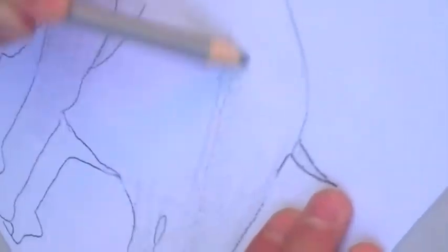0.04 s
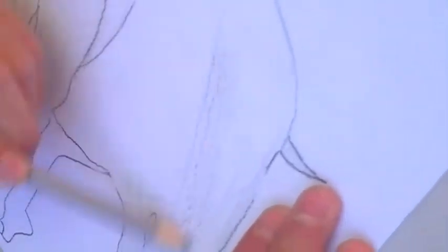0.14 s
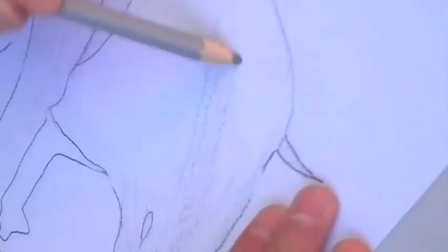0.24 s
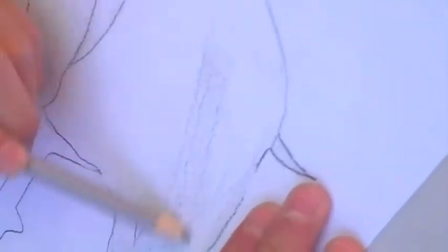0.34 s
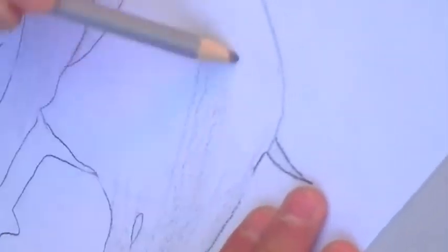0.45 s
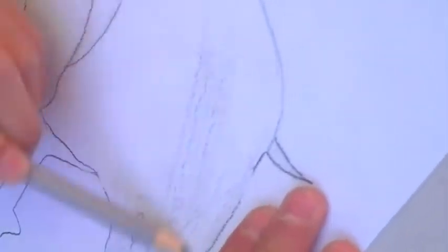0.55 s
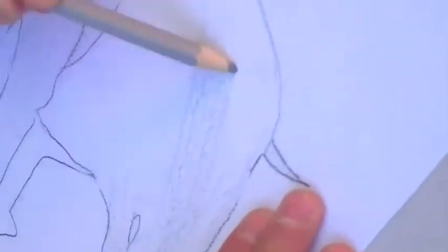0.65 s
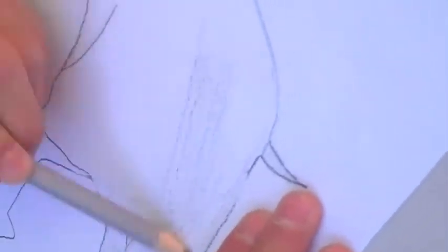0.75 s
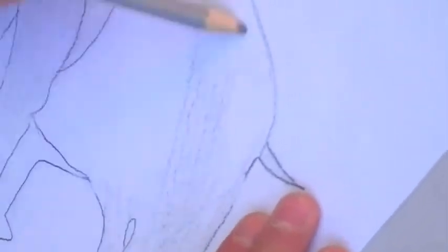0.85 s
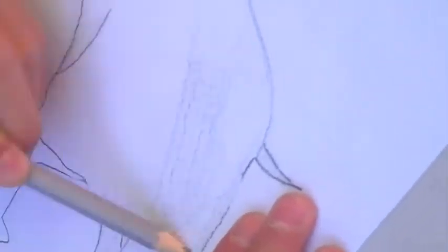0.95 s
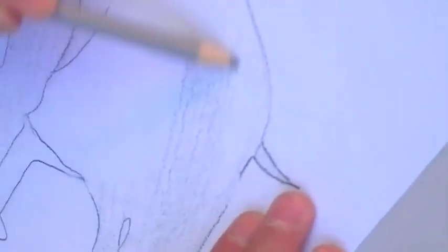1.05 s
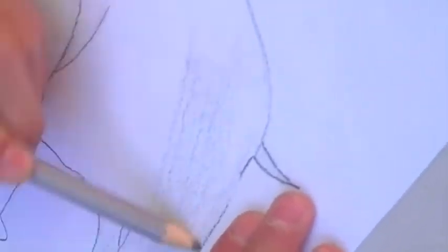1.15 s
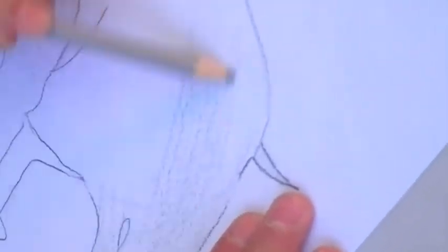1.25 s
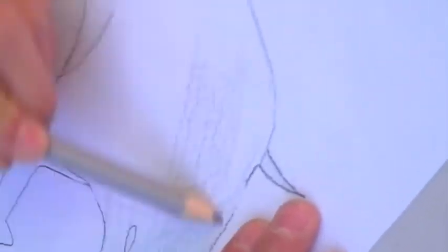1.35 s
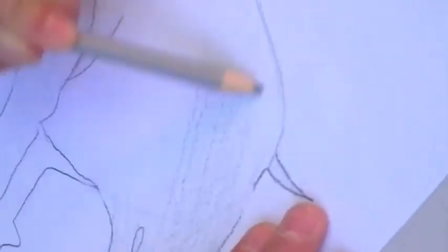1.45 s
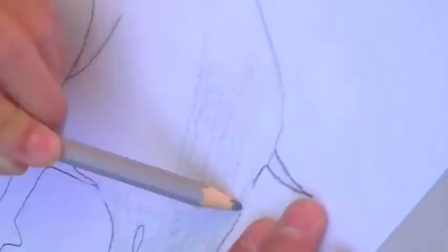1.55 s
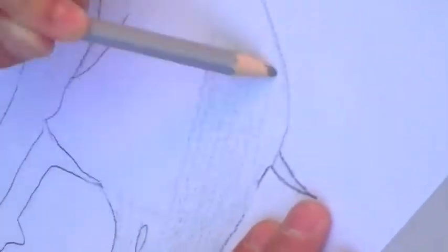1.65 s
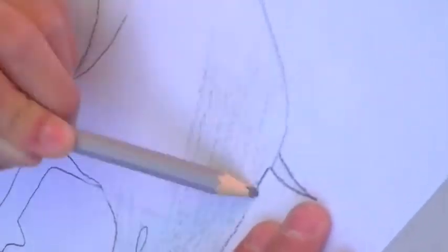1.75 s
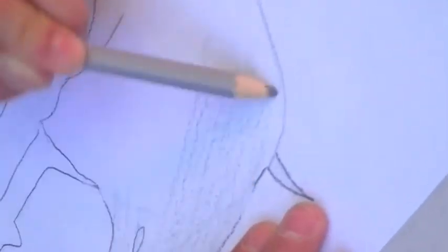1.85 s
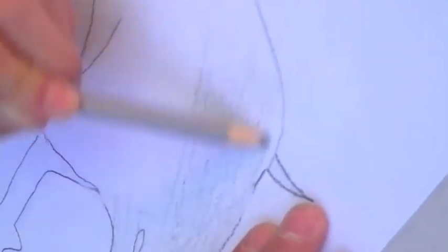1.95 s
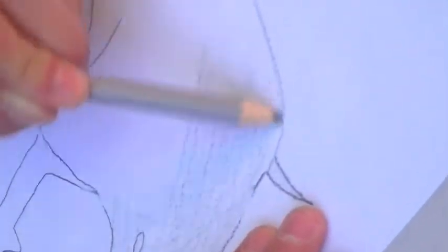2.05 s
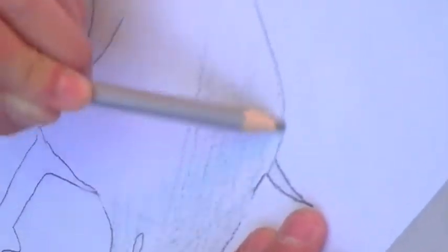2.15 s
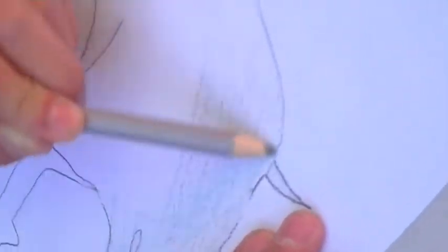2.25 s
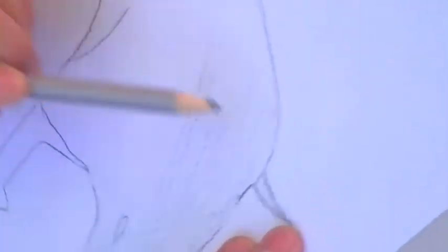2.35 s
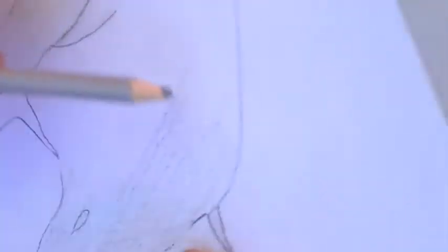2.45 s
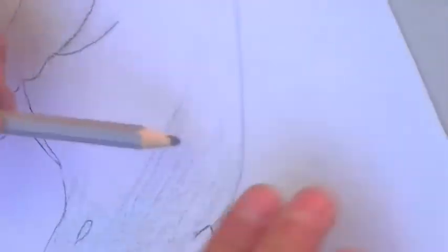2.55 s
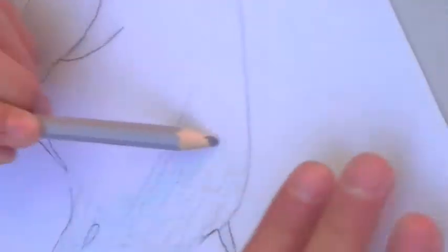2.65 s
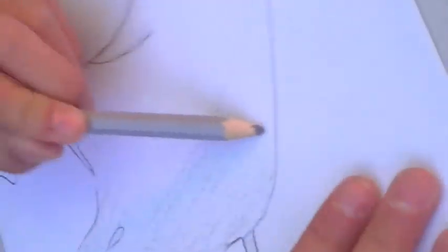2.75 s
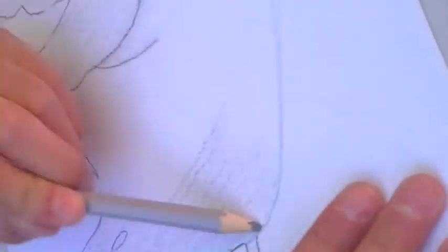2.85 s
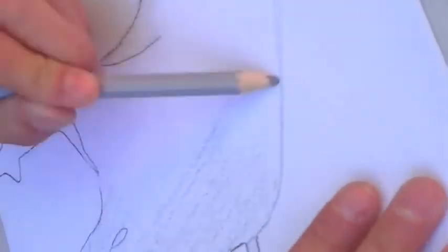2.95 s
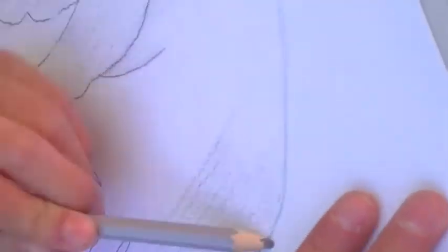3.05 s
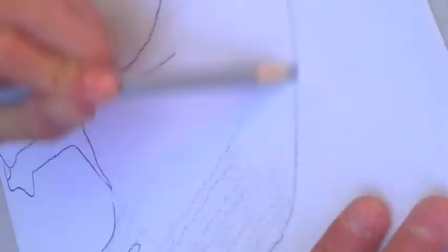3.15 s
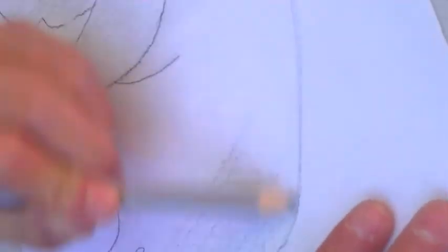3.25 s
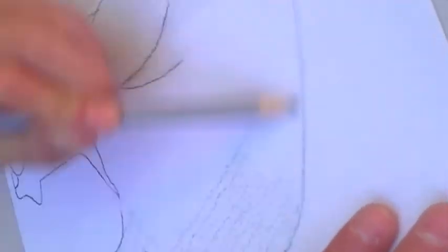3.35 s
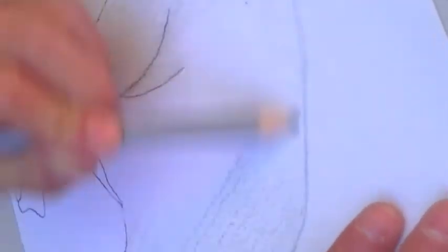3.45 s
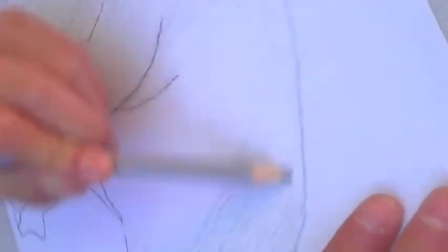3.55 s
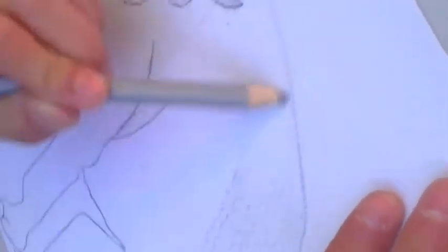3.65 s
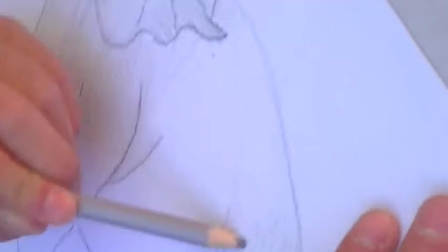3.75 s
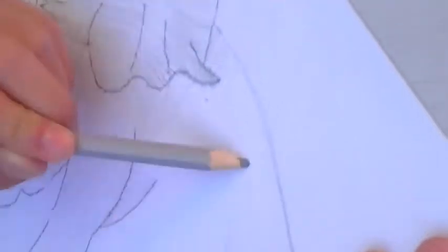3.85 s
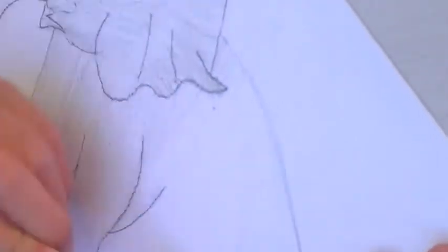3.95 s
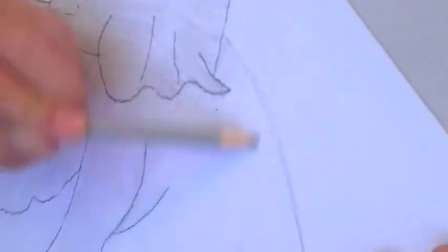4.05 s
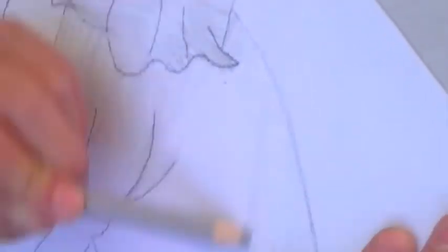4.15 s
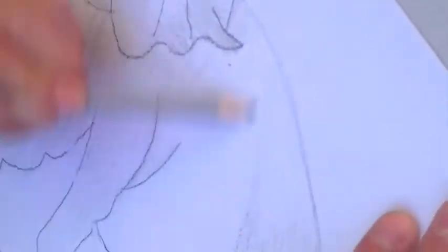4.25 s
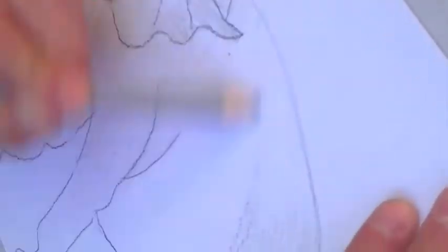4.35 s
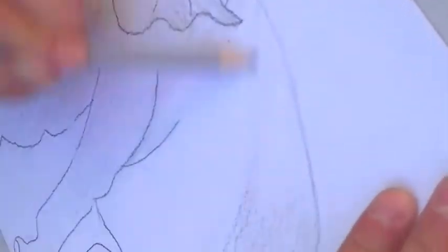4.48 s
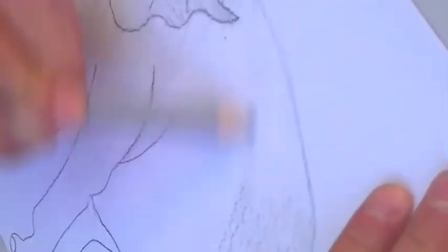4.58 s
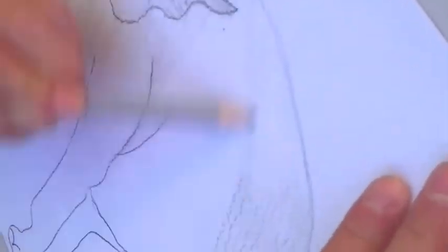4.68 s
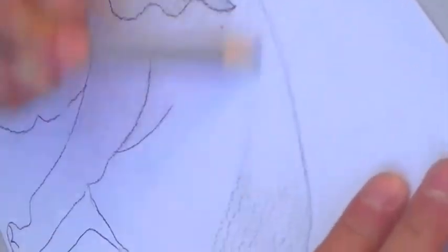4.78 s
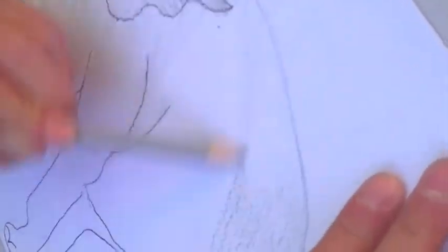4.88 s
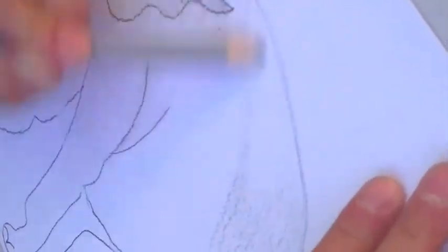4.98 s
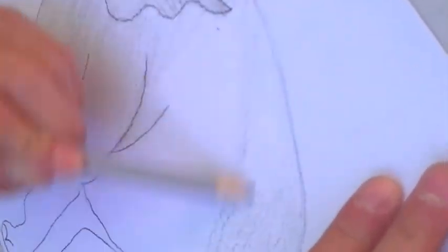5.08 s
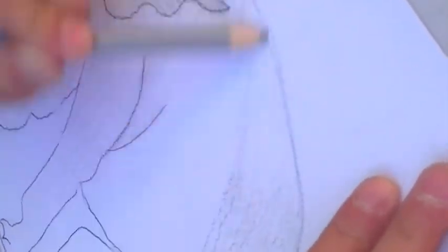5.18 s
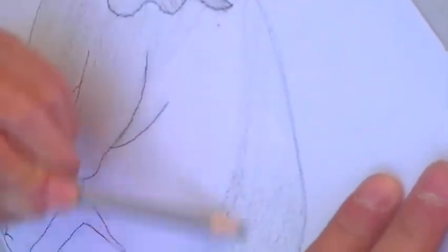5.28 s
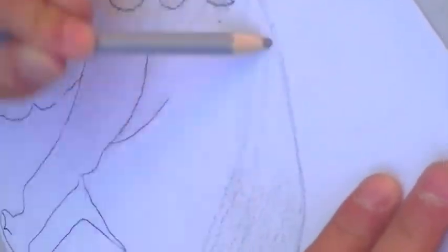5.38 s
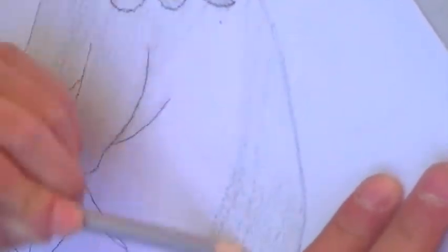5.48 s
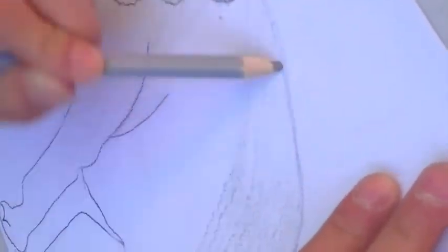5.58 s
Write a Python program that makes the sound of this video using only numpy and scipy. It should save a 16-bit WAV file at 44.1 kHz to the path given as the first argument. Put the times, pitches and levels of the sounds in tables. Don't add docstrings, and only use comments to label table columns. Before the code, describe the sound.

In a quiet room, a hand shades paper with a wooden pencil, very close to a small stereo microphone. About ten quick scratchy strokes a second rasp brightly, fade and nearly stop around two and a half seconds, then resume more softly. Light taps and a sharp knock near four seconds interrupt, then even shading continues to the end.

```python
import sys
import numpy as np
from scipy import signal
from scipy.fft import rfft, irfft, next_fast_len
from scipy.io import wavfile
from scipy.ndimage import uniform_filter1d

SR = 44100
rng = np.random.default_rng(int(sys.argv[2]) if len(sys.argv) > 2 else 0)


def wrap_up_sound(samples):
    columns = np.atleast_2d(samples).T
    tamed = np.clip(columns, -1, 1)
    steps = np.round(tamed * 32767).astype(np.int16)
    wavfile.write(sys.argv[1], SR, steps)


def convert_level_to_amplitude(level_db):
    exponent = np.asarray(level_db, float) / 20
    return 10 ** exponent


N = 247842
LEFT_RIGHT = np.array([[1], [-1]])


def unit(x):
    return x / np.sqrt(np.mean(x ** 2))


def on_log_axis(table, hz):
    points = np.array(table)
    return np.interp(np.log(np.maximum(hz, 1)), np.log(points[:, 0]), points[:, 1])


def colour(x, table):
    size = next_fast_len(N)
    hz = np.arange(size // 2 + 1) * SR / size
    return irfft(rfft(x, size) * convert_level_to_amplitude(on_log_axis(table, hz)), size)[:N]


def resonate(x, hz, width):
    b, a = signal.iirpeak(hz, hz / width, SR)
    return signal.lfilter(b, a, signal.lfilter(b, a, x))


def walk(rate):
    k = max(int(SR / rate), 1)
    held = np.repeat(rng.standard_normal(N // 100)[:N // k + 1], k)[:N]
    return unit(uniform_filter1d(uniform_filter1d(held, k), k))


# (f/Hz, level/dB per Hz)
ROOM_MID = [(20, 7.5), (60, -18), (120, -11.5), (225, -12), (350, -7), (480, -11.5), (1000, -21),
            (1300, -10.5), (2200, -11), (4800, -9.5), (6500, -25.5), (9000, -32.5), (13000, -42.5),
            (15500, -32)]
# (f/Hz, level/dB per Hz)
ROOM_SIDE = [(20, -2), (60, -12), (120, -4.5), (250, -2), (600, -8.5), (1000, -17), (1310, -17.5),
             (1800, -17), (4100, -9.5), (6500, -17.5), (9000, -18.5), (13000, -56), (15500, -52)]


def room():
    mid = unit(colour(rng.standard_normal(N), ROOM_MID)) * convert_level_to_amplitude(-52 + 0.13 * walk(5.71))
    side = unit(colour(rng.standard_normal(N), ROOM_SIDE)) * convert_level_to_amplitude(-56.5 + 3.5 * walk(6.6))
    return (mid + side * LEFT_RIGHT) * convert_level_to_amplitude(-.8 * LEFT_RIGHT)


# (t/s of the turn that starts it, tooth hiss level/dB)
FIRST_PATCH = [(-0.06, -33.5), (0.014, -38), (0.121, -38.5), (0.225, -36.5), (0.329, -41), (0.431, -37),
               (0.528, -39.5), (0.632, -38), (0.735, -39.5), (0.84, -37.5), (0.945, -40.5), (1.054, -38.5),
               (1.157, -39.5), (1.256, -41.5), (1.367, -39.5), (1.466, -40.5), (1.559, -41.5),
               (1.651, -41.5), (1.742, -41), (1.841, -43.5), (1.932, -40.5), (2.007, -43.5), (2.094, -45),
               (2.197, -49), (2.276, -48.5), (2.363, -49), (2.436, -44.5), (2.56, -67), (2.735, -51)]
# (t/s of the turn that starts it, tooth hiss level/dB)
SECOND_PATCH = [(2.832, -45), (2.943, -42.5), (3.049, -43), (3.154, -41), (3.268, -43), (3.38, -42.5),
                (3.492, -44), (3.601, -49), (3.724, -54), (3.79, -50), (3.849, -55), (3.9, -51),
                (3.968, -46.5), (4.062, -43), (4.176, -42.5), (4.281, -42.5), (4.396, -41.5),
                (4.508, -41.5), (4.616, -43), (4.729, -44), (4.837, -44), (4.943, -44), (5.046, -43.5),
                (5.155, -41), (5.255, -42), (5.363, -41), (5.465, -42), (5.577, -38.5), (5.68, -44)]
# (t/s, grip as shaft ring over hiss level/dB, palm dragging on the sheet level/dB)
HAND = [(0.0, 10.5, -46.5), (0.12, -1, -53), (0.55, 0.5, -62), (1.2, -3.5, -51), (1.85, -7, -64),
        (2.0, -20, -67), (2.28, -11, -48.5), (2.43, -24, -40.5), (2.57, -14, -51), (2.82, -9, -62),
        (2.95, 0, -55), (3.4, -2, -48), (3.5, -0.5, -42.5), (3.75, -8, -44), (3.86, 10.5, -42),
        (3.97, -0.5, -42), (4.07, 0, -49.5), (5.62, 1.5, -48)]


def motion():
    s, top_db = np.transpose(FIRST_PATCH + SECOND_PATCH)
    when, grip_db, palm_db = np.transpose(HAND)
    t = np.arange(N) / SR
    k = np.clip(np.searchsorted(s, t, side="right") - 1, 0, len(s) - 2)
    length = s[k + 1] - s[k]
    way = (-1.) ** k
    top_speed_at = 0.5 - 0.01 * way
    along = np.clip((t - s[k]) / length, 0, 1) ** (np.log(.5) / np.log(top_speed_at))
    speed = np.sin(np.pi * along) ** (0.062 / length)
    grip = np.interp(s[k] + length / 2, when, grip_db)
    shaft_db = grip + 0.1 * way
    board_db = -12.5 + 0.52 * grip - 0.56 * (top_db[k] - np.median(top_db))
    palm = convert_level_to_amplitude(np.interp(t, when, palm_db))
    return speed, top_db[k], palm, shaft_db, board_db


# (t/s, peak level/dB, shaft ring level/dB over peak)
SNAGS = [(0.0658, -10, -8.5), (0.096, -15.5, -38), (0.243, -42, -5), (0.343, -17.5, -26),
         (0.5432, -21, -19), (0.575, -25, 5), (0.667, -14, -12), (0.867, -19.5, 2), (1.086, -19.5, -1),
         (1.1897, -23.5, 1.5), (1.283, -21.5, 0.5), (1.5896, -17, -10), (1.6874, -23, -2),
         (3.077, -20, -22), (3.226, -18, -9.5), (3.782, -40.5, 5), (3.9, -35, 9), (4.0892, -39, 13.5),
         (4.3158, -31.5, -1), (4.5655, -17, -22), (4.7592, -28, 9.5), (4.986, -29, 10.5), (5.0918, -37, -3),
         (5.3814, -26, -10), (5.3981, -31.5, 7), (5.493, -14.5, -28), (5.5947, -36, 1)]


def bites():
    t = np.arange(N) / SR
    tooth, shaft = np.zeros(N), np.zeros(N)
    starts = [(s + .019, db + 16, -18, 0.0056) for s, db in FIRST_PATCH[1:] + SECOND_PATCH]
    for s, db, shaft_db, fade in starts + [(*snag, 0.013) for snag in SNAGS]:
        i = slice(int(s * SR), int((s + .12) * SR))
        grip = np.exp(-(t[i] - s) / fade)
        tooth[i] += convert_level_to_amplitude(db - 21.5) * grip
        shaft[i] += convert_level_to_amplitude(db + shaft_db - 14) * grip
    return tooth, shaft


def scrape(catch, grit_db):
    return unit(rng.standard_normal(N) * convert_level_to_amplitude(grit_db * rng.exponential(size=N)) * catch)


def sheen(band, speed, sliding, grip_db):
    moving = np.clip(np.hypot(speed / .5, sliding), .3, 1) ** 2 / (speed + .3) ** .25
    up = max(band - 10, 0)
    return moving ** (up / 2) * convert_level_to_amplitude(-0.05 * grip_db * up)


# (f/Hz, level/dB per Hz)
TOOTH = [(900, -24.5), (1500, -17.5), (2500, -10.5), (3320, -12), (4100, -8.5), (5060, -10.5),
         (6200, -10.5), (7200, -15), (8200, -25), (11500, -30), (13900, -38), (15500, -87)]
# (f/Hz, side over mid level/dB)
TOOTH_WIDE = [(900, -30), (1400, -50), (2000, -9), (2600, -4), (3500, -8.5), (5000, -6.5), (7500, -4),
              (10000, 1.5), (15500, 0.5)]


def tooth_hiss(catch, speed, sliding, grip_db):
    mid, side = (rfft(colour(scrape(catch, grit_db=1.5), TOOTH)) for _ in range(2))
    hz = np.arange(len(mid)) * SR / N
    pair = mid + convert_level_to_amplitude(on_log_axis(TOOTH_WIDE, hz)) * side * LEFT_RIGHT
    place = 3 * np.log2(np.maximum(hz, 1) / 700)
    hiss = np.zeros((2, N))
    for k in range(15):
        band = irfft(pair * np.clip(1 - abs(place - k), 0, 1), N)
        flicker = convert_level_to_amplitude(3.15 * walk(70) + 1.55 * walk(15))
        hiss += band * sheen(k, speed, sliding, grip_db) * flicker
    return unit(hiss)


# (f/Hz, width/Hz, level/dB)
LEAD = [(4034, 280, -2.5), (4970, 145, 4.5), (5650, 440, 0.5), (6540, 530, 0.5), (8800, 590, -11.5)]


def lead_flecks(speed):
    flecks = np.zeros((2, N))
    for hz, width, db in LEAD:
        flare = convert_level_to_amplitude(db + 2.9 * walk(90))
        flecks += flare * resonate(rng.standard_normal((2, N)), hz, 1.66 * width)
    return unit(flecks[0] + 0.56 * flecks[1] * LEFT_RIGHT) * speed


# (f/Hz, width/Hz, level/dB)
SHAFT = [(1944, 122, 9.5), (2035, 238, 8.5), (2464, 470, 0.5), (1575, 60, 0)]


def shaft_ring(catch):
    judder = scrape(catch * convert_level_to_amplitude(1.5 * walk(120)), grit_db=1.6)
    return unit(sum(convert_level_to_amplitude(db + 0.85 * walk(14)) * resonate(judder, hz, 0.85 * w) for hz, w, db in SHAFT))


# (f/Hz, width/Hz, level/dB)
BOARD = [(330.5, 67, -1), (651, 157, -7.5), (1398, 240, -1)]


def board_ring(catch):
    push = scrape(catch * convert_level_to_amplitude(2.1 * walk(60)), grit_db=1.6)
    return unit(sum(convert_level_to_amplitude(db) * resonate(push, hz, w) for hz, w, db in BOARD))


def pencil():
    speed, top_db, palm, shaft_db, board_db = motion()
    tooth_bite, shaft_bite = bites()
    catch = convert_level_to_amplitude(1.65 * walk(90) + 0.41 * walk(250))
    hiss = tooth_hiss(catch, speed, palm / convert_level_to_amplitude(top_db), shaft_db)
    hiss = unit(hiss + convert_level_to_amplitude(-1.5) * lead_flecks(speed))
    stroke = convert_level_to_amplitude(top_db - 1.5) * speed ** 1.22
    hiss = hiss * np.sqrt((0.44 * palm) ** 2 + stroke ** 2 + tooth_bite ** 2)
    sing = convert_level_to_amplitude(top_db + shaft_db - 0.96) * speed ** 5.6
    shaft = shaft_ring(catch) * np.hypot(sing, shaft_bite)
    board = board_ring(catch) * convert_level_to_amplitude(top_db + board_db - 0.5) * speed ** 1.8
    return hiss + shaft * (1 - 0.059 * LEFT_RIGHT) + board


# (t/s, peak level/dB, pitch share of the table modes, ring length share)
TAPS = [(0.024, -32.5, 1.28, 0.87), (0.039, -29, 1.13, 0.75), (0.221, -32.5, 1.1, 0.64),
        (0.467, -13, 1.07, 0.81), (0.475, -21.5, 1.01, 0.8), (0.493, -33, 1, 1.2), (1.412, -11, 1.13, 0.94),
        (1.425, -22, 1.04, 1.7), (1.441, -34.5, 0.97, 1.3), (1.607, -31.5, 1.08, 1.34),
        (3.201, -22, 0.96, 0.61), (3.856, -19, 1.08, 0.79), (3.885, -32.5, 1.01, 2.6), (3.91, -24, 1, 0.69),
        (3.95, -4.5, 1.05, 0.85), (5.01, -20, 1, 1.17), (5.034, -34, 1.01, 1.1)]
# (t/s, peak level/dB, pitch share of the table modes, hollow level/dB over peak, ring length share)
KNUCKLES = [
    (1.396, -38, 1.23, -5, 0.86),
    (2.881, -45, 1.1, -6.5, 0.87),
    (3.341, -39, 1.4, -15, 0.73),
    (3.43, -37.5, 1.33, -19, 1.1),
    (3.815, -33.5, 0.74, -20, 0.4),
    (3.863, -36.5, 0.76, -25, 0.97),
    (3.94, -32, 1.16, -9, 0.87),
    (5.004, -32, 1.15, 2, 1.43),
    (5.026, -26.5, 1.05, -22, 1.6),
]
# (t/s, peak level/dB, pitch share
RIM = [
    (3.811, -21, 0.96, 1.25),
    (3.897, -36, 0.92, 2.2),
    (3.963, -27, 1.18, 1.1),
    (3.968, -50, 0.74, 0.84),
    (4.151, -35, 0.81, 1.3),
    (4.157, -32.5, 0.96, 2.1),
    (4.168, -38, 0.894, 2.2),
]


def contacts():
    taps = [(s, db, -31.5 - 0.17 * db, -15.5, pitch, ring) for s, db, pitch, ring in TAPS]
    padded = [(s, db, -25, -30, pitch, ring) for s, db, pitch, ring in RIM]
    knuckles = [(s, db, -12.5, hollow_db, pitch, ring) for s, db, pitch, hollow_db, ring in KNUCKLES]
    return taps + padded + knuckles


# (f/Hz, level/dB, t60/s)
TABLE = [(1318, -7.5, 0.014), (1850, -19.5, 0.019)]
# (f/Hz, level/dB, t60/s)
HOLLOW = [(659, 0.5, 0.013), (888, -16.5, 0.053)]
# (f/Hz, t60/s)
THUD = (187, 0.027)
# (f/Hz, t60/s)
CLICK = (3100, .007)


def knocks():
    out = np.zeros((2, N + SR))
    t = np.arange(int(.08 * SR)) / SR

    def mode(hz, t60):
        return np.cos(2 * np.pi * hz * (t - .0021)) * np.exp(-np.log(1000) * t / t60)

    for s, db, thud_db, hollow_db, pitch, ring in contacts():
        build = np.sin(np.pi / 2 * np.clip(t / (.002 * ring ** 1.5), 0, 1)) ** 4
        click = convert_level_to_amplitude(-18.5 + 0.05 * db) * mode(*CLICK)
        body = sum(convert_level_to_amplitude(g) * mode(hz * pitch, t60 * ring) for hz, g, t60 in TABLE)
        hollow = sum(convert_level_to_amplitude(g + hollow_db) * mode(hz * pitch, t60 * ring) for hz, g, t60 in HOLLOW)
        thud = convert_level_to_amplitude(thud_db) * mode(THUD[0] * pitch, THUD[1])
        pair = (body + hollow + thud) * (1 + 0.08 * LEFT_RIGHT) + click * (1 + 0.64 * LEFT_RIGHT)
        i = int(s * SR)
        out[:, i:i + len(t)] -= convert_level_to_amplitude(db + 11.5) * build * pair
    return out[:, :N]


def scene():
    near = pencil() + knocks()
    t = np.arange(int(.25 * SR)) / SR
    walls = rng.standard_normal((2, len(t))) * np.exp(-np.log(1000) * t / 0.11) * (t > .004)
    answer = signal.fftconvolve(near, walls, axes=1)[:, :N]
    return near + convert_level_to_amplitude(-48) * answer + room()


def low_pass(x):
    return signal.sosfilt(signal.butter(12, 15640, fs=SR, output="sos"), x)


def record(dry):
    bass_cut = signal.butter(2, 92, "high", fs=SR, output="sos")
    mix = signal.sosfilt(bass_cut, dry) - .0023
    return low_pass(mix)


dry = scene()
out = record(dry)
wrap_up_sound(out)
```